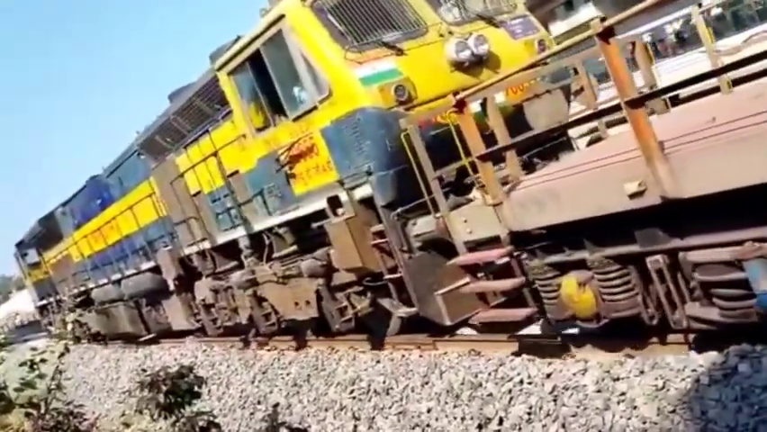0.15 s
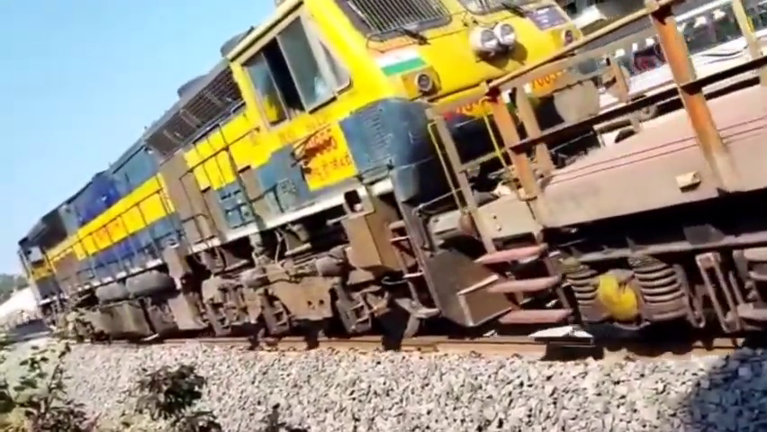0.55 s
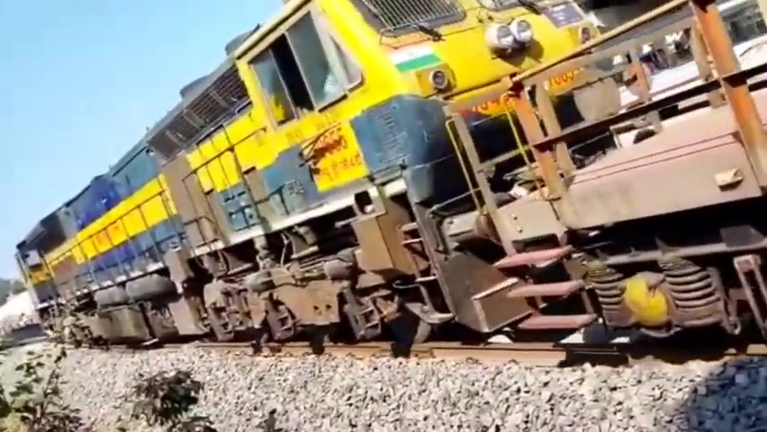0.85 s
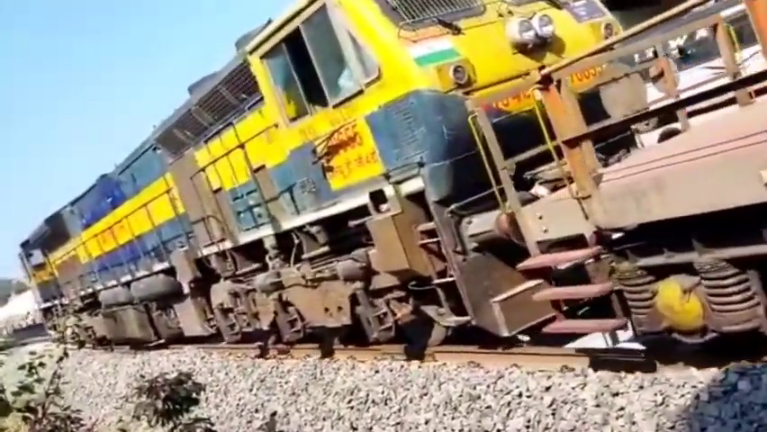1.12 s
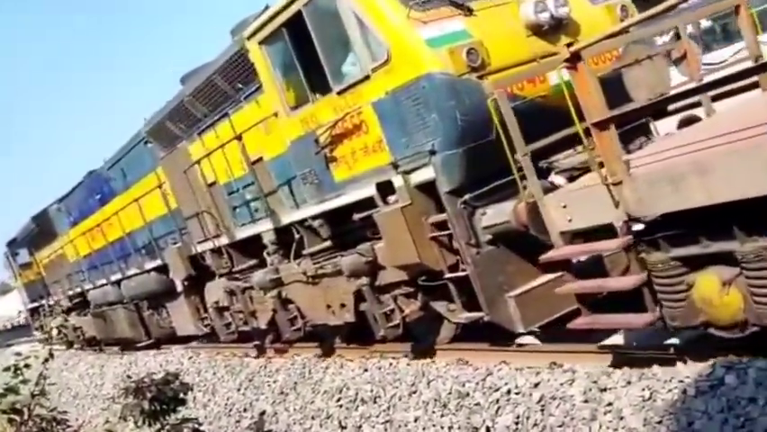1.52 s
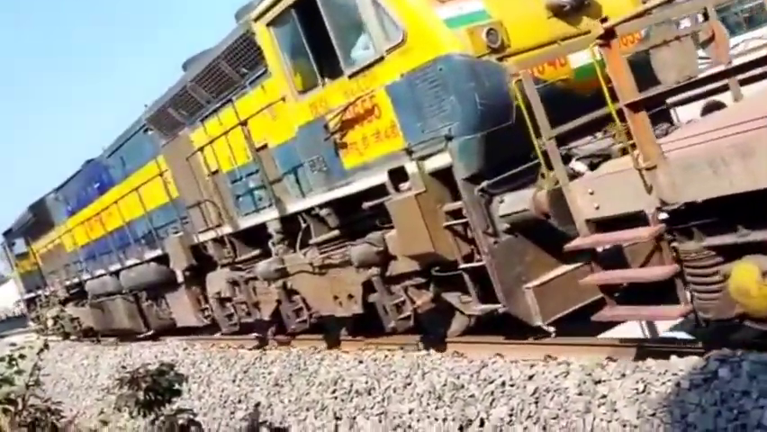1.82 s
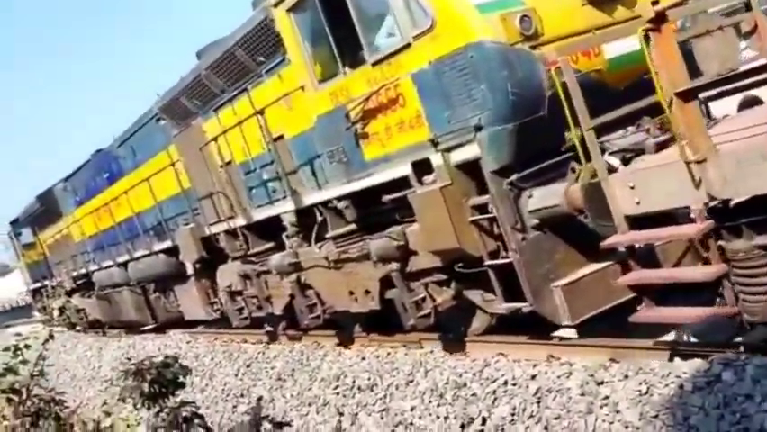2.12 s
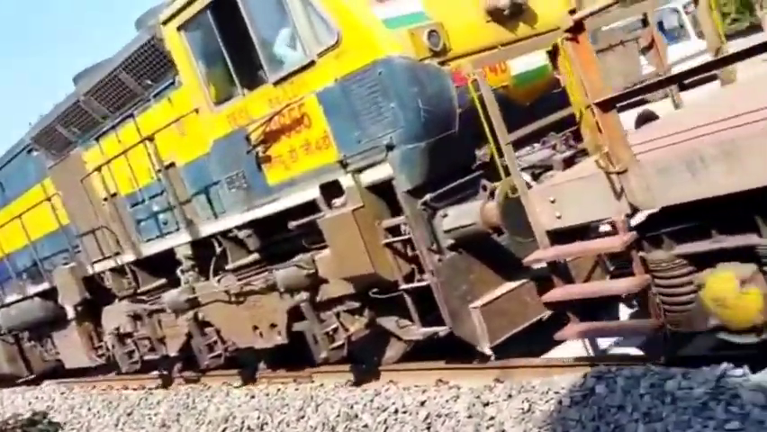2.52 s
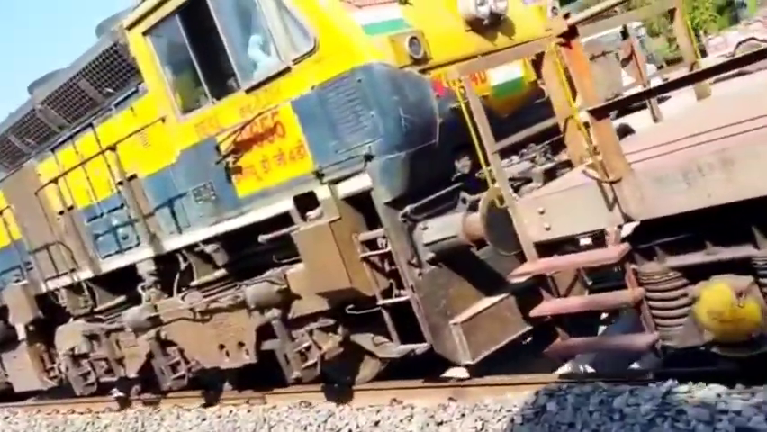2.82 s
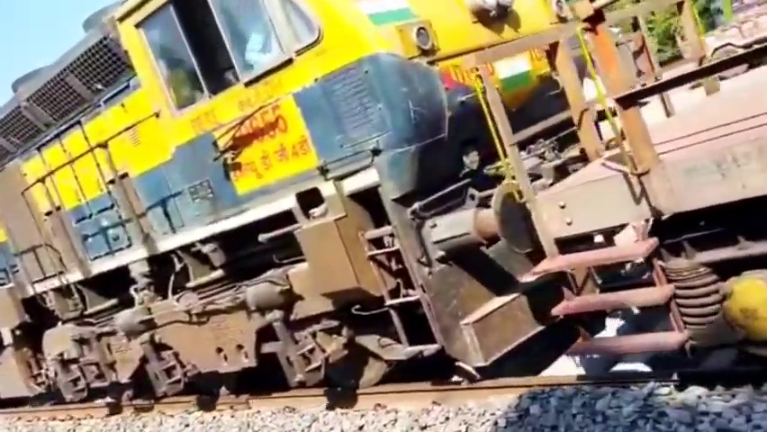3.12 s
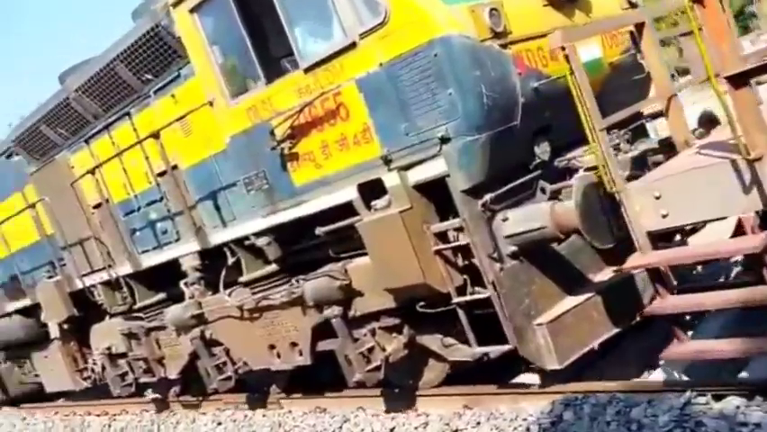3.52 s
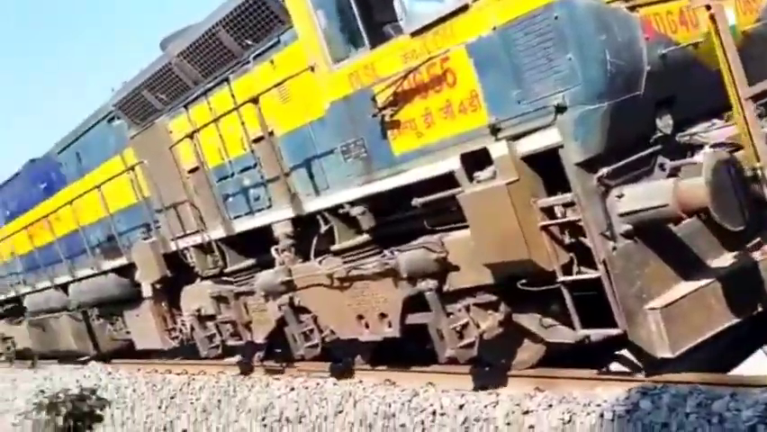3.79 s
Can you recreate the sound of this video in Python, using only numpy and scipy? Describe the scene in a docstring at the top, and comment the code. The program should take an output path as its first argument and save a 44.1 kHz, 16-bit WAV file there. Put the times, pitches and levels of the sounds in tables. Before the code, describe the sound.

A diesel locomotive's air horn is already blaring at 0 s, very close: two clashing steady notes, brassy, rough and swaying over rushing air, distorting the microphone and pushing the engine down. At about 2.5 s it cuts off abruptly with a brief bright hiss. A blurred outdoor echo fades over the next second, while the fast low engine throb, broad roar and high whines rise and continue to about 4 s.

```python
"""Trackside, close range: a diesel locomotive rolls past the microphone, sounding a two-bell air horn.
The horn, two stacks of swaying harmonics over rushing air, overloads the microphone and the limiter
pushes down the engine: two beating low notes, a roar of shaped noise and a few wavering whines.
The blast ends with a short hiss of bright noise and the gain recovers: a far echo of blurred
partials dies away under the throb, roar and whine of the engine."""
import sys
import numpy as np
from scipy import signal
from scipy.io import wavfile
from scipy.ndimage import uniform_filter1d, minimum_filter1d

SR = 44100
rng = np.random.default_rng(int(sys.argv[2]) if len(sys.argv) > 2 else 0)


def bounce(signal):
    """Save signal as a 16-bit WAV file at the path given by the first command-line argument."""
    frames = np.transpose(np.atleast_2d(signal))
    limited = np.clip(frames, -1, 1)
    pcm = np.round(limited * 32767).astype(np.int16)
    wavfile.write(sys.argv[1], SR, pcm)


N = 174195
TIME = np.arange(N) / SR


def from_db(db):
    """Decibels to gain."""
    return np.exp(np.asarray(db) * (np.log(10) / 20))


def rms_one(x):
    """Scale to unit power."""
    return x / np.sqrt(np.mean(np.abs(x) ** 2) + 1e-20)


def in_time(rows):
    """Join (time, value) points by straight lines."""
    return np.interp(TIME, *np.transpose(rows))


def at_hz(rows, hz, axis=1):
    """Read one column of a table on a log-frequency axis."""
    rows = np.array(rows)
    return np.interp(np.log(hz), np.log(rows[:, 0]), rows[:, axis])


def pan(db):
    """Left and right gains of constant power, from left minus right in dB."""
    return rms_one(from_db(np.array([[db], [-db]]) / 2))


def drift(rate):
    """Smooth random curve of unit power, with little faster than the rate (Hz)."""
    step = 40  # samples between the points of the curve
    lowpass = signal.butter(3, rate, fs=SR / step, output="sos")
    # the first 2000 points let the filter settle
    slow = signal.sosfilt(lowpass, rng.standard_normal(N // step + 2002))[2000:]
    return np.interp(np.arange(N) / step, np.arange(len(slow)), rms_one(slow))


def scatter(rate):
    """Random swing of a tone's strength and phase, as a complex gain of unit power."""
    return rms_one(drift(rate) + 1j * drift(rate))


# stereo spread of every noise at the microphone:
# (frequency [Hz], left-right likeness [-1 to 1], left minus right [dB])
NOISE_STEREO = [(60, 1, -5), (300, 0.99, 1), (630, 0.27, -2.5), (1030, -0.039, 0), (1670, -0.33, -9),
                (4000, -0.025, -4), (8000, 0.21, -2.5), (13000, -0.21, 2)]
NOISE_FLICKER_DB = .6


def banded_noise(spectrum):
    """Half-octave bands of stereo noise, each with its own level, slight flicker and width."""
    out = 0
    edges = 22 * 2 ** np.arange(0, 9.6, .5)
    white = rng.standard_normal((2, 2, N))
    for k, (low, high) in enumerate(zip(edges, edges[1:])):
        hz = np.sqrt(low * high)
        if hz < spectrum[0][0] / 2:
            continue
        bandpass = signal.butter(2, [low, high], "band", fs=SR, output="sos")
        # neighbouring bands draw on different noise
        mid, side = signal.sosfilt(bandpass, white[k % 2])
        alike = np.clip(at_hz(NOISE_STEREO, hz), -1, 1)
        level_db = at_hz(spectrum, hz) + NOISE_FLICKER_DB * drift(7.2)
        gain = from_db(level_db) * pan(at_hz(NOISE_STEREO, hz, axis=2))
        stereo = np.sqrt(1 + alike) * mid + np.sqrt(1 - alike) * side * [[1], [-1]]
        out = out + gain * stereo
    return rms_one(out)


# shared treble level of the horn: (time [s], level [dB])
TREBLE = [(0, 6.5), (.3, -1.5), (.55, -0.5), (1.05, 5), (1.5, 2), (1.8, 5.5), (2.1, 5), (2.33, -3),
          (2.55, -4.5)]
# how far the left side leads the right as the horn moves past the microphone:
# (frequency [Hz], lead at the start [rad], lead at the end of the blast [rad])
PORT_LEAD = [(310, 0, 0), (447, 0, .3), (893, 0, 0), (1240, 0, 0), (1340, -3.1, -1), (1786, .7, 2),
             (2232, 1.5, 2), (2679, 2.4, 2), (4000, 2, 1.5)]
LOW_BELL_HZ, HIGH_BELL_HZ = 310.55, 446.55
HORN_OFF_S = 2.538
TREBLE_FROM_HZ = 1100
PITCH_WANDER, PITCH_JITTER = 0.00048, 0.00043  # shares of the pitch
SWAY_HZ, ROUGHNESS_HZ = 8, 45.2
# slow sway and fast roughness of a partial; power of its frequency
SWAY, ROUGHNESS, SCATTER_GROWTH = 0.25, 0.21, 0.29
SIDE_SWAY = 0.37  # opposed left-right sway, relative to the sway in common
# weak treble partials drop in and out
DROPOUT_DB, DROPOUT_HZ, DROPOUT_BELOW_DB = 6.5, 18.3, -16


def bell(pitch_hz, partials, own_curves, push=0):
    """One diaphragm's harmonics, phase-shifted by a push (rad), with a slow sway and a fast roughness."""
    wander = PITCH_WANDER * drift(7.5) + PITCH_JITTER * drift(40)
    phase = push + 2 * np.pi * np.cumsum(pitch_hz * (1 + wander)) / SR
    treble = from_db(in_time(TREBLE))
    out = 0
    for k, db, pan_db in partials:
        k = round(k)
        hz = k * pitch_hz
        if k in own_curves:
            gain = from_db(in_time(own_curves[k]))
        elif hz > TREBLE_FROM_HZ:
            gain = treble
        else:
            gain = 1
        weakness = np.clip((DROPOUT_BELOW_DB - db) / 10, 0, 1)
        dropout_db = DROPOUT_DB * weakness * drift(DROPOUT_HZ) * (hz > TREBLE_FROM_HZ)
        sway = scatter(SWAY_HZ) + SIDE_SWAY * scatter(SWAY_HZ) * [[1], [-1]]
        swings = SWAY * sway + ROUGHNESS * scatter(ROUGHNESS_HZ)
        unsteady = 1 + (hz / HIGH_BELL_HZ) ** SCATTER_GROWTH * swings
        lead_ends = [at_hz(PORT_LEAD, hz), at_hz(PORT_LEAD, hz, axis=2)]
        lead = np.interp(TIME, [0, HORN_OFF_S], lead_ends)
        ports = pan(pan_db) * np.exp(-1j * lead * np.array([[0], [1]]))
        tone = from_db(db + dropout_db) * gain * np.exp(1j * k * (phase + k))
        out = out + np.real(ports * unsteady * tone)
    return np.sqrt(2) * out


# partials of each bell before the horn's own level:
# (multiple of the pitch, level [dB], left minus right [dB])
LOW_BELL = [(1, -10.5, 0), (2, -25, 14), (3, -21, -6.5), (4, -45, -9), (5, -52, -2), (6, -60, -6),
            (7, -59.5, -17)]
HIGH_BELL = [(1, -3.5, 0), (2, -7.5, 0), (3, -11.5, 0.5), (4, -16, -9.5), (5, -21.5, -6), (6, -24.5, 1),
             (7, -34, -12), (8, -36.5, -0.5), (9, -42, -18.5), (10, -40.5, -7), (11, -58.5, -8),
             (12, -48.5, 5.5), (13, -57, -19), (14, -47.5, -11), (15, -55, 17.5)]
# relative loudness of the horn at the microphone: (time [s], level [dB])
BLAST = [(0, -5.5), (.35, -3), (.7, -2.5), (.79, 1), (.95, -2), (1.115, -1), (1.15, -5.5), (1.68, -4),
         (1.8, -2.5), (1.9, -5.5), (1.97, -2), (2.125, -0.5), (2.16, -3.5), (2.46, -3), (2.53, 1.5)]
# moments where the level dips briefly: (time [s], depth [dB])
DIPS = [(0.379, 5.5), (1.151, 5)]
# level of the low bell's second partial: (time [s], level [dB])
LOW_SECOND = [(0, 4), (1.1, -8.5), (1.4, -12), (1.8, 2), (2.5, 4)]
# levels of the high bell's first three partials: (time [s], level [dB])
FUNDAMENTAL = [(0, 1.5), (.5, 0.5), (.7, -3.5), (1.5, 2.5), (1.75, -6), (1.92, -5.5), (2.05, -4), (2.3, -1),
               (2.55, -9.5)]
SECOND = [(0, 0), (.35, -3.5), (.7, -2), (1.0, 2.5), (1.25, 0.5), (1.7, -1), (2.1, -2), (2.4, 1),
          (2.56, 1.5)]
THIRD = [(0, -0.5), (.25, -9), (.8, -17.5), (1.08, 4), (1.25, -8), (1.6, -2.5), (1.95, 1.5), (2.2, -6.5),
         (2.55, -9.5)]
# air rushing through the bells: (frequency [Hz], relative density [dB per Hz])
AIR = [(30, 9), (150, 21.5), (1000, 14), (4000, -14), (8000, -3), (11000, -10), (15000, -25)]
HORN_DB, HORN_FALL_DB_PER_S = 22, 259
DIP_S = 0.0055
AIR_DB, AIR_FOLLOWS = -9, 2.2  # level; dB of air per dB of horn
COUPLING_RAD, COUPLING_SWING_DB, COUPLING_SWING_HZ = 0.032, 8, 21


def horn():
    """Two bells over rushing air until the valve shuts with a hiss; the low bell shakes the high one's wave."""
    blast_db = in_time(BLAST)
    dips_db = sum(depth * np.exp(-((TIME - s) / DIP_S) ** 2) for s, depth in DIPS)
    level_db = HORN_DB + blast_db - dips_db
    push_size = COUPLING_RAD * from_db(blast_db + COUPLING_SWING_DB * drift(COUPLING_SWING_HZ))
    push = push_size * np.sin(2 * np.pi * LOW_BELL_HZ * TIME)
    low = bell(LOW_BELL_HZ, LOW_BELL, {2: LOW_SECOND})
    high = bell(HIGH_BELL_HZ, HIGH_BELL, {1: FUNDAMENTAL, 2: SECOND, 3: THIRD}, push)
    bells = from_db(level_db) * (low + high)
    air = from_db(AIR_DB + AIR_FOLLOWS * blast_db) * banded_noise(AIR)
    shut_off = from_db(-HORN_FALL_DB_PER_S * np.maximum(TIME - HORN_OFF_S, 0))
    return (bells + air + hiss()) * shut_off


# the engine's two beating low notes: (frequency [Hz], level before THROB_DB [dB])
ENGINE_NOTES = [(91.6, -22), (103.85, -28)]
# turbocharger and gear whines:
# (frequency [Hz], rate of wavering [Hz], level before WHINE_DB [dB], left minus right [dB])
WHINES = [(2955, 20, -39, -7), (3456, 12, -32, 0), (5378, 55, -40, -7)]
# level of throb and roar, held down during the blast, back up soon after it: (time [s], level [dB])
LOW_RETURN = [(0, -8.5), (2.66, -9), (2.82, 1), (3.4, 0.5), (3.95, 1)]
# fans and exhaust: (frequency [Hz], relative density [dB per Hz])
ROAR = [(25, -15), (42, -20), (55, 1), (100, -6), (160, 2.5), (280, 1.5), (450, -2), (700, -6), (1000, -10),
        (1500, -6), (2200, -8.5), (2900, -9.5), (3800, -24), (4500, -16), (6500, -36.5), (10000, -33),
        (15000, -46.5)]
THROB_PEAK_S = 3.42  # both notes crest together here
THROB_DB, THROB_WAVER = -1, 0.24
WHINE_DB, WHINE_STEADY = 2, 1.3  # trim; steady part against a scatter of 1
ROAR_DB = -23


def engine():
    """Two low notes beat twelve times a second under the roar of fans and exhaust and a few whines."""
    throb = 0
    for hz, db in ENGINE_NOTES:
        waver = 1 + THROB_WAVER * drift(6.7)
        throb = throb + from_db(db + THROB_DB) * waver * np.cos(2 * np.pi * hz * (TIME - THROB_PEAK_S))
    whines = 0
    for hz, width, db, pan_db in WHINES:
        waver = rms_one(WHINE_STEADY + np.array([scatter(width), scatter(width)]))
        tone = np.real(waver * np.exp(2j * np.pi * hz * TIME))
        whines = whines + from_db(db + WHINE_DB) * pan(pan_db) * tone
    roar = from_db(ROAR_DB) * banded_noise(ROAR)
    return np.sqrt(2) * whines + from_db(in_time(LOW_RETURN)) * (np.sqrt(2) * throb + roar)


# colour of the closing hiss: (frequency [Hz], relative density [dB per Hz])
HISS = [(1500, -12), (4500, 1), (8000, -4), (14000, 0)]
HISS_S, HISS_WIDTH_S, HISS_DB, HISS_PAN_DB = 2.535, .024, -2, -2


def hiss():
    """A short swell of bright noise as the blast ends."""
    swell = np.exp(-.5 * ((TIME - HISS_S) / HISS_WIDTH_S) ** 2)
    return from_db(HISS_DB) * swell * pan(HISS_PAN_DB) * banded_noise(HISS)


# partials of the far echo: (frequency [Hz], level [dB], left minus right [dB])
ECHO = [(310.5, -33, 0), (446, -23.5, -2), (621, -35, 0), (894, -28, 0), (1338, -32, -4), (1785, -36, -8),
        (2232, -32, -11), (2679, -38, -9), (3125, -44, -2), (3570, -42, -2)]
ECHO_DELAY_S, ECHO_BLUR = 0.21, 0.62
ECHO_FALL_DB_PER_S = 20  # at the high bell's pitch
ECHO_FALL_GROWTH = 0.45  # higher partials die sooner: power of the frequency


def horn_echo():
    """Blurred partials from the surroundings hold through and past the blast, then die, highest fastest."""
    since = np.maximum(TIME - HORN_OFF_S - ECHO_DELAY_S, 0)
    out = 0
    for hz, db, pan_db in ECHO:
        blur = rms_one(1 + ECHO_BLUR * np.array([scatter(6.9), scatter(13.0)]))
        lead = at_hz(PORT_LEAD, hz, axis=2) * np.array([[0], [1]])
        fall_rate = ECHO_FALL_DB_PER_S * (hz / HIGH_BELL_HZ) ** ECHO_FALL_GROWTH
        tone = np.real(blur * np.exp(1j * (2 * np.pi * hz * TIME - lead)))
        out = out + from_db(db - fall_rate * since) * pan(pan_db) * tone
    return np.sqrt(2) * out


def scene():
    """Horn, echo and engine at the trackside."""
    return horn() + horn_echo() + engine()


CEILING_DB, HOLD_S, RELEASE_DB_PER_S = -2.5, 0.011, 167.5


def limiter(x):
    """The gain ducks under the peaks, holds, then recovers at a steady rate."""
    size = int(HOLD_S * SR)
    climb = RELEASE_DB_PER_S * TIME
    peak_db = 20 * np.log10(np.abs(x).max(axis=0) + 1e-9)
    # the highest peak so far, sinking at the release rate
    held_db = np.maximum.accumulate(peak_db + climb) - climb
    gain_db = minimum_filter1d(np.minimum(CEILING_DB - held_db, 0), size)
    return x * from_db(uniform_filter1d(gain_db, size))


# steady hiss of the recorder: (frequency [Hz], relative density [dB per Hz])
SELF_NOISE = [(100, 8.5), (3000, -0.5), (6000, -2), (10000, -1.5), (15000, -15.5)]
SELF_NOISE_DB = -44.5
OVERLOAD_DB, OVERLOAD_KNEE = 22.5, 15  # a higher knee bends more sharply
OVERLOAD_SKEW = 0.019  # one side of the wave flattens sooner: share of the overload level
CUTOFF_HZ = 15700


def record(dry):
    """The microphone flattens peaks, the limiter rides the level, a faint hiss is added, the top is cut."""
    top = from_db(OVERLOAD_DB)
    pushed = dry / top + OVERLOAD_SKEW
    bent = pushed / (1 + np.abs(pushed) ** OVERLOAD_KNEE) ** (1 / OVERLOAD_KNEE)
    flattened = top * (bent - OVERLOAD_SKEW)
    highpass = signal.butter(1, 22, "high", fs=SR, output="sos")
    blocked = signal.sosfilt(highpass, flattened)
    out = limiter(blocked) + from_db(SELF_NOISE_DB) * banded_noise(SELF_NOISE)
    top_cut = signal.ellip(10, .1, 80, CUTOFF_HZ, fs=SR, output="sos")
    return signal.sosfilt(top_cut, out)


dry = scene()
out = record(dry)
bounce(out)
```